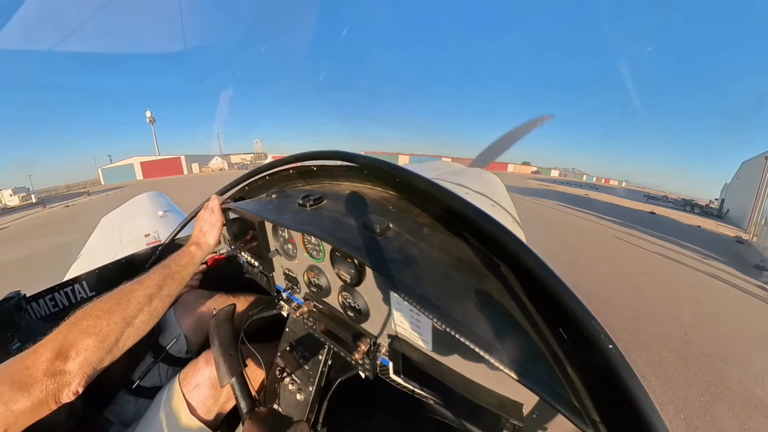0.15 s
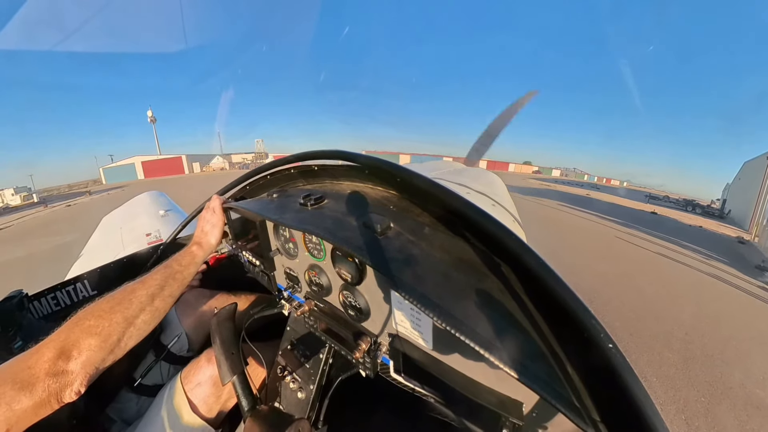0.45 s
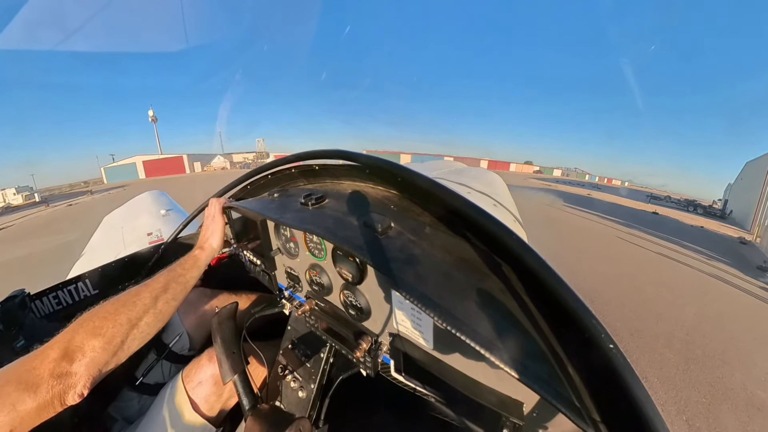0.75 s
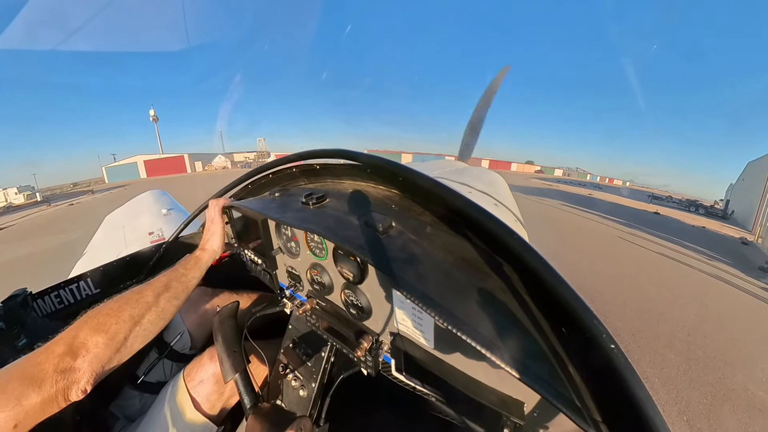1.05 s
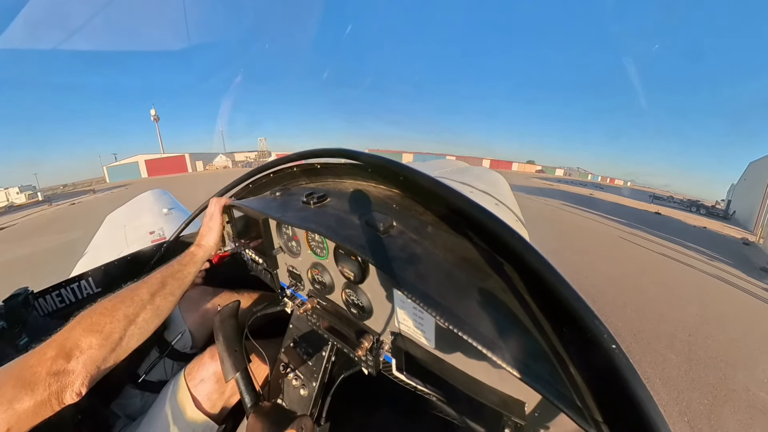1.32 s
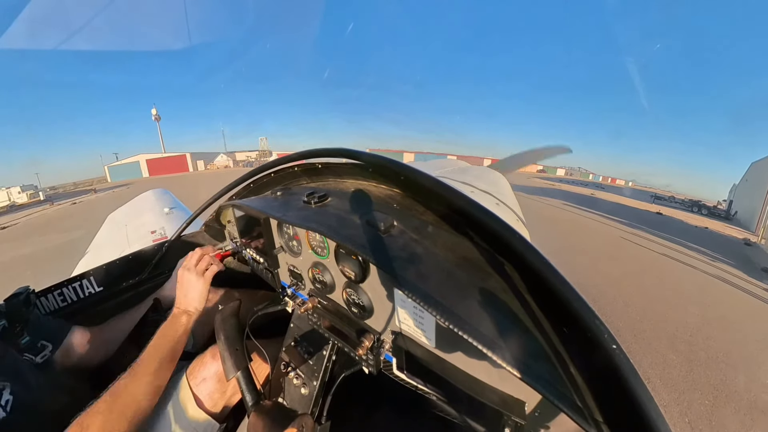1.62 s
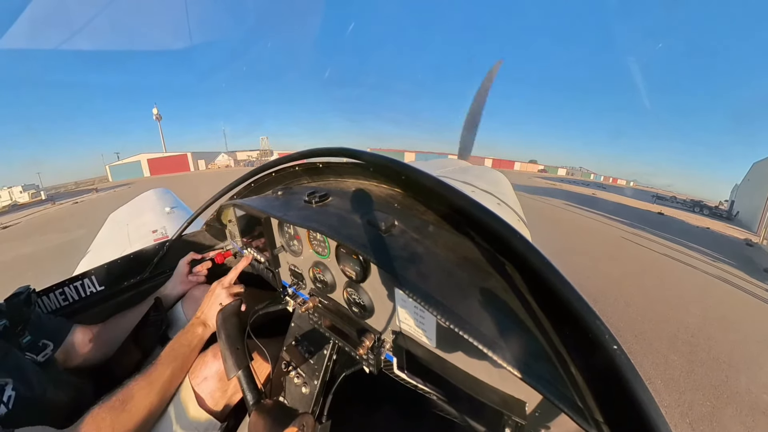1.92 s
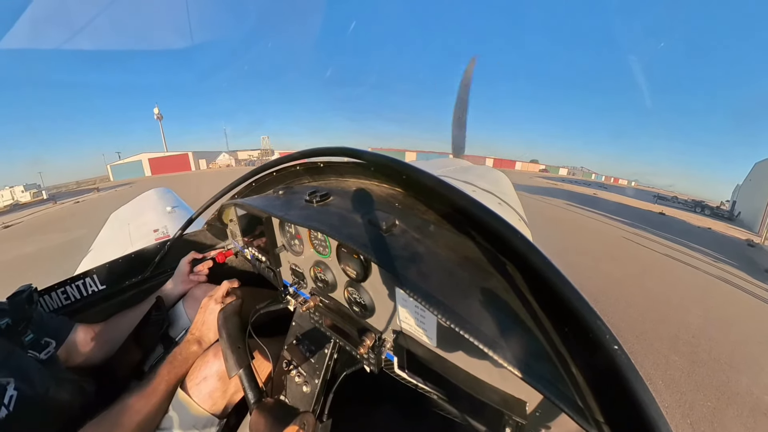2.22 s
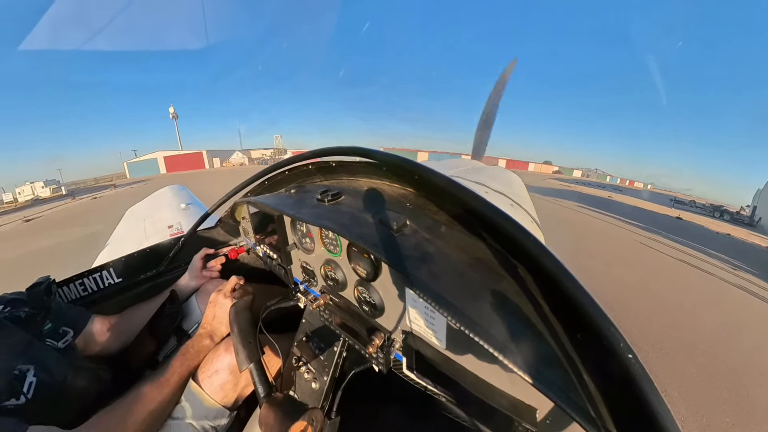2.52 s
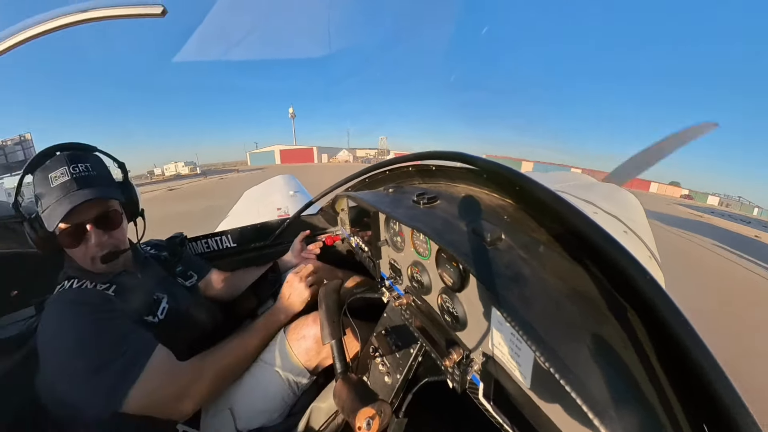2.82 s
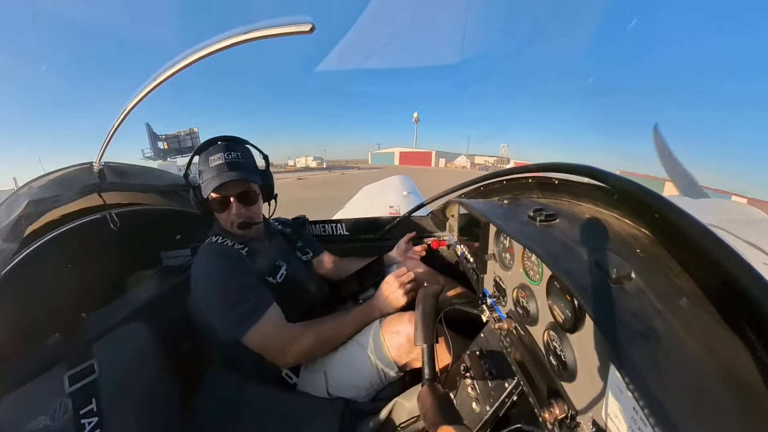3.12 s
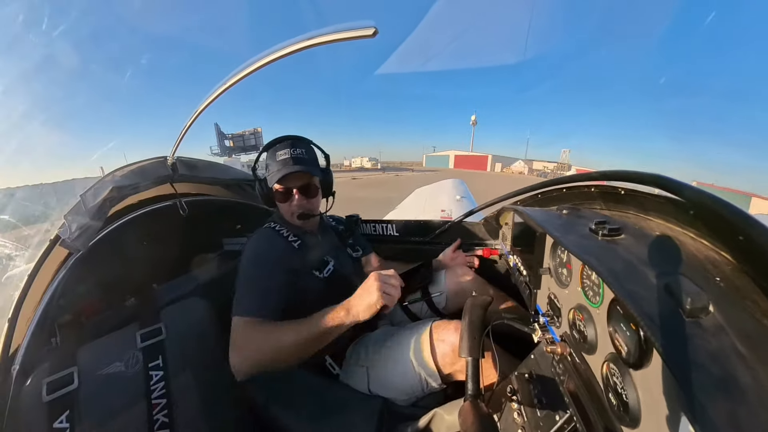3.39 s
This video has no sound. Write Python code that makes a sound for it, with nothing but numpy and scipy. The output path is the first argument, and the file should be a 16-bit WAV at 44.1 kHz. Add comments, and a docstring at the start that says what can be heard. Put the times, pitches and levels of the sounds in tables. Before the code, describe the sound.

Small aircraft engine idles with a low, wavering boom, plus a scuff and a few dry pops

```python
"""Idling aircraft engine from inside the cockpit

Heard in a closed cockpit: a four-cylinder engine booms, a wavering tone at the firing rate under shaped-noise
rumble, with a thin treble of valve gear throbbing once per engine cycle. Firings stumble, and the speed dips
briefly, then sags and recovers. A hand scuffs and ticks on the canopy frame: noise bursts over ringing modes.
A few dry pops right at the microphone are filtered kicks in stereo, with crackle and a faint cabin echo.
"""
import sys
import numpy as np
from scipy import signal
from scipy.fft import rfft, irfft, next_fast_len
from scipy.io import wavfile
from scipy.ndimage import uniform_filter1d

SR = 44100
rng = np.random.default_rng(int(sys.argv[2]) if len(sys.argv) > 2 else 0)


def inscribe(sig):
    """Save sig as 16-bit PCM at rate SR to the path in sys.argv[1].

    A 1-D sig is mono; a 2-D sig holds one channel per row.
    Samples are clipped to [-1, 1] before scaling.
    """
    pcm = np.round(np.clip(np.atleast_2d(sig).T, -1, 1) * 32767)
    wavfile.write(sys.argv[1], SR, pcm.astype(np.int16))


N = 156555
CYLINDERS = 4


def undb(db):
    """Decibels to gain."""
    return 10 ** (np.asarray(db) / 20)


def unit(x):
    """Scale to rms 1."""
    return x / np.sqrt(np.mean(x ** 2))


def curve(rows):
    """Join (seconds, value) rows by straight lines."""
    return np.interp(np.arange(N) / SR, *np.array(rows).T)


def noise():
    """White noise of rms 1."""
    return rng.standard_normal(N)


def walk(rate):
    """Smooth random wandering of rms 1, with about `rate` new values per second."""
    hold = int(SR / rate)
    steps = np.repeat(rng.standard_normal(N // hold + 1), hold)
    smooth = uniform_filter1d(uniform_filter1d(steps, hold), hold)
    return unit(smooth[:N])


def filtered(x, response):
    """Apply a response given as a function of frequency in Hz."""
    size = next_fast_len(2 * N)
    hz = np.maximum(np.fft.rfftfreq(size, 1 / SR), 1e-3)
    return irfft(rfft(x, size) * response(hz), size)[:N]


def colour(x, points):
    """Shape a sound by (Hz, dB) points, joined over log frequency."""
    hz, db = np.array(points).T
    return filtered(x, lambda f: undb(np.interp(np.log(f), np.log(hz), db)))


def swell(start, attack, decay):
    """Linear rise, then exponential fall; all times in seconds."""
    age = np.arange(N) / SR - start
    return np.clip(age / attack, 0, 1) * np.exp(-np.maximum(age - attack, 0) / decay)


def hump(centre, half):
    """A smooth bell of height 1; it falls to 1/e at `half` seconds from the centre."""
    return np.exp(-((np.arange(N) / SR - centre) / half) ** 2)


# Engine speed before its wander. Each row: time in seconds, firings per second.
SPEED_CURVE = [(0.0, 69), (0.15, 76.4), (0.2, 80.6), (0.29, 84.7), (0.325, 68.3), (0.36, 87.6),
               (0.45, 85.7), (0.6, 81.7), (0.72, 84), (0.8, 63), (0.84, 69), (0.92, 69.7), (0.98, 79.5),
               (1.21, 81.8), (1.6, 80.6), (2.0, 78.2), (2.4, 76), (2.9, 76.5), (3.55, 75.8)]
SPEED_WANDER = 0.0096  # rms, as a share of the speed


def firing_rate():
    """The idle follows its speed curve and wanders slightly around it."""
    return curve(SPEED_CURVE) * (1 + SPEED_WANDER * walk(40))


# Stumbles, where firings come weak. Each row: centre in seconds, half length in seconds, depth in dB.
STUMBLE_ROWS = [(0.02,0.0086,16.5),(0.058,0.0086,15.5),(0.102,.013,14),(.135,0.0098,12.5),(0.167,.01,10.5),(0.224,0.01,15.5),(0.374,0.0087,5),(.415,.012,9.5),(0.496,0.017,9.5),(0.768,0.029,6.5),(0.863,.017,16.5),
                (1.116,.015,4),(1.543,.018,4),(2.252,.014,11),(2.35,.014,6),(2.512,.02,6.5),(2.631,.012,12),(2.736,.01,5),(2.835,.016,9),(2.889,.02,8.5),(3.145,0.017,8),(3.51,0.0084,10)]


def stumbles():
    """Weakness of the firings in dB: one smooth bell per stumble."""
    return sum(depth * hump(centre, half) for centre, half, depth in STUMBLE_ROWS)


# Boom heard in the cabin, before trim and flutter. Each row: time in seconds, rms level in dB.
BOOM_LEVEL = [(0.0, -31.5), (0.2, -23), (0.3, -25.5), (0.6, -23.5), (0.7, -26.5), (0.8, -33), (0.9, -22),
              (1.05, -26), (1.5, -24.5), (2.2, -23.5), (2.7, -24), (3.1, -25), (3.55, -24.5)]
BOOM_TRIM_DB, BOOM_FLUTTER_DB = 0.15, 1.2
CABIN_HZ, SLIP_SHARE = 89.87, 0.6036  # the cabin's own pitch; how readily the boom slips to it


def boom(firing_hz, weak_db):
    """The cabin booms at the firing rate; weak firings let it fade and slip toward the cabin's own pitch."""
    slip = 1 - undb(-weak_db * SLIP_SHARE)
    boom_hz = firing_hz + slip * (CABIN_HZ - firing_hz)
    tone = np.sqrt(2) * np.sin(2 * np.pi * np.cumsum(boom_hz) / SR)
    level_db = curve(BOOM_LEVEL) + BOOM_TRIM_DB - weak_db + BOOM_FLUTTER_DB * walk(50)
    return tone * undb(level_db)


# Airframe rumble before trim and stumbles. Each row: time in seconds, level in dB.
RUMBLE_LEVEL = [(0,-37.5),(.11,-37.5),(.19,-38),(.25,-42),(.31,-44),(.35,-38),(.43,-39.5),(.48,-42.5),(.66,-44),(.77,-46),(.83,-46),(.862,-39.5),(.9,-42.5),(1.05,-41),(1.26,-41),(1.45,-44),(2.0,-43.5),(2.42,-43),(2.68,-41),(2.77,-42.5),(2.87,-43.5),(3.05,-43),(3.35,-43.5),(3.55,-39.5)]
# Cabin response to the firings. Each row: frequency in Hz, relative density in dB per Hz.
CABIN_COLOUR = [(15,-17.5),(30,-8),(55,-5.5),(75,-17.5),(110,3.5),(160,-0.5),(182,-4),(208,-1),(245,-6),(290,-8),(340,-10),(420,-13),(520,-20.5),(700,-27),(1000,-37.5),(1400,-42),(2000,-51),(5000,-81.5),(12000,-105)]
RUMBLE_TRIM_DB, RUMBLE_FLUTTER_DB = 0.56, 1.36
FIRING_PULSE_DB, CYCLE_PULSE_DB = 3.3, 1.2
STUMBLE_SHAKE = 0.1  # dB more rumble per dB of stumble


def rumble(cycles, weak_db):
    """The exhaust shakes the airframe with each firing and each engine cycle, harder in a stumble."""
    surge_db = FIRING_PULSE_DB * np.cos(2 * np.pi * CYLINDERS * cycles)
    surge_db = surge_db + CYCLE_PULSE_DB * np.cos(2 * np.pi * cycles) + RUMBLE_FLUTTER_DB * walk(25)
    shaking = unit(colour(noise() * undb(surge_db), CABIN_COLOUR))
    return shaking * undb(curve(RUMBLE_LEVEL) + RUMBLE_TRIM_DB + STUMBLE_SHAKE * weak_db)


# Low buffeting under the rumble. Each row: time in seconds, level in dB.
BUFFET_LEVEL = [(0,-32),(.13,-41),(.24,-35),(.42,-44.5),(.55,-51),(.8,-45.5),(1.0,-50),(1.4,-49.5),(2.2,-44),(2.65,-44),(2.9,-35),(3.05,-51.5),(3.55,-49)]
# Its spectrum. Each row: frequency in Hz, relative density in dB per Hz.
BUFFET_SPECTRUM = [(12,-17.5),(25,-5),(52,5.5),(75,-4.5),(105,10),(160,-3.5),(200,-22),(400,-71),(1500,-110)]


def buffeting():
    """Low-frequency noise whose level rises and falls."""
    return unit(colour(noise(), BUFFET_SPECTRUM)) * undb(curve(BUFFET_LEVEL))


# Weaker shaft lines, before effort and flutter. Each row: multiple of the engine cycle, rms level in dB.
SHAFT_LINE_ROWS = [(2, -41), (3, -45), (5, -47), (6, -47.5), (7, -54), (8, -56), (10, -54.5), (11, -54.5),
                   (13, -57.5), (14, -56)]
SHAFT_FLUTTER_DB, SHAFT_WAVER = 3, .2  # waver is in turns of phase
SHUDDER_S, SHUDDER_HALF_S, SHUDDER_DB = .84, 0.17, -36.5


def shaft_lines(cycles):
    """Unequal cylinders add wavering lines that come and go; the engine rocks at shaft rate as it sags."""
    # the shaft turns twice per engine cycle
    tone = np.sin(4 * np.pi * cycles) * undb(SHUDDER_DB) * hump(SHUDDER_S, SHUDDER_HALF_S)
    effort_db = curve(RUMBLE_LEVEL) - np.mean(curve(RUMBLE_LEVEL))
    for multiple, db in SHAFT_LINE_ROWS:
        phase = multiple * cycles + rng.random() + SHAFT_WAVER * walk(12)
        tone = tone + np.sin(2 * np.pi * phase) * undb(db + effort_db + SHAFT_FLUTTER_DB * walk(14))
    return np.sqrt(2) * tone


# Reference level of the treble in the cabin. Each row: time in seconds, level in dB.
TREBLE_LEVEL = [(0,-73),(.16,-72),(.21,-79),(.27,-75),(.36,-74),(.44,-73),(.47,-83),(.5,-78),(.515,-75),(.62,-74.5),(.72,-79),(.85,-76),(1.15,-75.5),(1.46,-74),(1.53,-78),(1.62,-75),(2.1,-75.5),(2.14,-77.5),(2.18,-72.5),(2.39,-73.5),(2.44,-79),(2.47,-75),(2.58,-76),(2.63,-74.5),(2.8,-75.5),(2.87,-76.5),(3.0,-73.5),(3.2,-76),(3.39,-73.5),(3.45,-77),(3.48,-75),(3.55,-76)]
# Valve gear rings. Each row: frequency in Hz, width in Hz, level in dB relative to the treble.
RING_ROWS = [(1499, 160, -1.5), (2606, 150, -9.5), (3320, 330, -11)]
# Mechanical hiss from the cowling. Each row: frequency in Hz, relative density in dB per Hz.
HISS_COLOUR = [(600,-12.5),(1200,-3),(1900,-3.5),(2250,0.5),(2650,-1),(2950,0),(3350,1),(3900,-2.5),(4400,-6),(5200,-11.5),(6500,-26.5),(9000,-39.5),(15000,-53)]
VALVE_PULSE_DB, VALVE_SCATTER_DB = 4, 2.5
HISS_DB = 1.46  # relative to the treble
HISS_PULSE_DB, HISS_CLUMP_DB, HISS_FLUTTER_DB = 0.86, 1.0, 2.2
STUMBLE_HUSH = .2  # dB less treble per dB of stumble


def valve_gear(cycles, weak_db):
    """Narrow rings and a hiss throb unevenly with the engine cycle and drop in a stumble."""
    throb = np.cos(2 * np.pi * cycles)
    rings = 0
    for hz, width_hz, db in RING_ROWS:
        drive = noise() * undb(VALVE_PULSE_DB * throb + VALVE_SCATTER_DB * walk(30))
        ring = filtered(drive, lambda f: 1 / (1 + 1j * (f - hz ** 2 / f) / width_hz) ** 2)
        rings = rings + undb(db) * unit(ring)
    # the hiss pulses once and twice per cycle
    clumps_db = HISS_PULSE_DB * (throb + np.cos(4 * np.pi * cycles))
    clumps_db = clumps_db + HISS_CLUMP_DB * walk(35) + HISS_FLUTTER_DB * walk(130)
    hiss = unit(colour(noise() * undb(clumps_db), HISS_COLOUR))
    return (rings + hiss * undb(HISS_DB)) * undb(curve(TREBLE_LEVEL) - STUMBLE_HUSH * weak_db)


def microphone_hiss():
    """Steady faint white noise of the microphone."""
    return undb(-101) * noise()


# Hand scuffs on the canopy frame. Each row: start in seconds, attack in seconds, decay in seconds, level in dB.
SCUFF_ROWS = [(0.635,0.011,0.013,-49),(.864,.003,0.066,-64.5),(0.94,0.025,0.13,-68),(1.426,0.0029,0.0085,-65)]
# Scuff spectrum. Each row: frequency in Hz, relative density in dB per Hz.
SCUFF_COLOUR = [(500,-17),(1200,-7),(1500,-7.5),(1750,-12.5),(2400,0),(2750,2.5),(3100,-3),(3550,-6),(5000,-14),(6500,-32.5),(13000,-36),(16000,-47.5)]
# Frame ringing under the first scuff. Each row: frequency in Hz, peak level in dB, time to fall 60 dB in seconds.
FRAME_RINGS = [(409,-40.5,0.16),(606,-48,0.12)]
SCUFF_GRAIN_DB = 2.2
FRAME_S = .645  # start of the ringing


def scuffs():
    """A hand rubs the canopy frame as grainy noise, and two frame modes ring briefly."""
    t = np.arange(N) / SR
    rub = unit(colour(noise() * undb(SCUFF_GRAIN_DB * walk(520)), SCUFF_COLOUR))
    strokes = sum(undb(db) * swell(s, attack, decay) for s, attack, decay, db in SCUFF_ROWS)
    ring = 0
    for hz, db, t60 in FRAME_RINGS:
        ring = ring + undb(db) * np.sin(2 * np.pi * hz * t) * swell(FRAME_S, 0.0045, t60 / np.log(1000))
    return rub * strokes + ring


# Small bright ticks on the frame. Each row: start in seconds, level in dB.
TICK_ROWS = [(1.965,-60),(1.987,-63.5)]
# Tick spectrum. Each row: frequency in Hz, relative density in dB per Hz.
TICK_COLOUR = [(800,-2),(1500,-3),(2500,-5.5),(4000,0),(5200,-4.5),(6300,-5.5),(7800,-15.5),(10400,-13),(12000,-29),(16000,-48)]
# Metallic ring after a tick. Each row: frequency in Hz, relative density in dB per Hz.
SHIMMER_COLOUR = [(4000,-18),(6300,-2.5),(7800,-7.5),(9200,-7.5),(9300,4),(9400,-8.5),(10400,-5.5),(10500,12),(10600,-6),(11300,-11.5),(15000,-14.5)]
TICK_DECAY_S = 0.003
SHIMMER_DB, SHIMMER_DECAY_S = -25.5, 0.077  # level relative to its tick


def ticks():
    """The hand ticks the frame: a very short noise burst, then a fainter metallic shimmer."""
    taps = sum(undb(db) * swell(s, .0005, TICK_DECAY_S) for s, db in TICK_ROWS)
    tails = sum(undb(db + SHIMMER_DB) * swell(s, .002, SHIMMER_DECAY_S) for s, db in TICK_ROWS)
    return unit(colour(noise(), TICK_COLOUR)) * taps + unit(colour(noise(), SHIMMER_COLOUR)) * tails


# Dry pops at the microphone. Each row: start in seconds, drive level in dB before filtering, body in Hz,
# edge in Hz, snap share from 0 to 1, top in Hz, left minus right of the thud in dB.
POP_ROWS = [(2.031,-16,300.2,481,0.03,1234,-3),(2.0521,-12.5,172,467,.001,2490,-8.5),(2.2188,-8.5,292,1080,0.36,8760,-10.5),(2.2405,-3,246,1330,0,5120,2.5),(2.9218,-7,211.2,1737,0.44,15010,3.5)]
POP_DAMPING = 0.9


def pops():
    """Each pop is a damped pressure swing: a soft thud to one side, plus a share of central snap."""
    out = np.zeros((2, N))
    for s, db, body_hz, edge_hz, snap, top_hz, pan_db in POP_ROWS:
        kick = np.zeros(N)
        kick[int(s * SR)] = undb(db) * SR / (2 * np.pi * body_hz)
        swing = filtered(kick, lambda f: 1 / (POP_DAMPING + 1j * (f / body_hz - body_hz / f)))
        swing = signal.sosfilt(signal.butter(4, top_hz, fs=SR, output="sos"), swing)
        thud = filtered(swing, lambda f: (1 - snap) / (1 + 1j * f / edge_hz) ** 2)
        out += thud * undb(np.array([[pan_db], [-pan_db]]) / 2) + snap * swing
    return out


# Crackle around the sharpest pops. Each row: start in seconds, length in seconds, level in dB before widening.
CRACKLE_ROWS = [(2.212,0.017,-43),(2.9123,0.014,-39)]
# Crackle spectrum. Each row: frequency in Hz, relative density in dB per Hz.
CRACKLE_COLOUR = [(200,1.5),(900,1.5),(2000,-7.5),(5500,-21),(8000,-28),(10000,-39.5),(15000,-34.5)]
CRACKLE_SPREAD, CRACKLE_GRAIN_DB = 0.85, 3  # side relative to mid; random level of each sample


def crackle():
    """Short bursts of grainy noise, spread wide across left and right."""
    t = np.arange(N) / SR
    mid, side = (unit(colour(noise() * undb(CRACKLE_GRAIN_DB * noise()), CRACKLE_COLOUR)) for _ in range(2))
    grains = mid + CRACKLE_SPREAD * side * np.array([[1], [-1]])
    bursts = 0
    for s, length, db in CRACKLE_ROWS:
        bursts = bursts + undb(db) * np.sin(np.pi * np.clip((t - s) / length, 0, 1))
    return grains * bursts


# Colour of the cabin echo. Each row: frequency in Hz, relative level in dB.
ECHO_COLOUR = [(200,-31),(700,-9),(2000,-1),(4000,-5),(6000,1),(9000,1),(14000,-8)]
ECHO_DB, ECHO_T60_S = -30, 0.94


def cabin_echo(x):
    """A faint diffuse tail: convolution with decaying noise, different left and right."""
    echo = []
    for _ in range(2):
        tail = colour(noise(), ECHO_COLOUR) * swell(0, .004, ECHO_T60_S / np.log(1000))
        echo.append(signal.fftconvolve(x, tail / np.linalg.norm(tail))[:N])
    return undb(ECHO_DB) * np.array(echo)


def scene():
    """Engine and hand sounds sit in the centre; pops, crackle and echo use both channels."""
    firing_hz = firing_rate()
    cycles = np.cumsum(firing_hz) / SR / CYLINDERS
    weak_db = stumbles()
    engine = boom(firing_hz, weak_db) + rumble(cycles, weak_db) + buffeting()
    engine = engine + shaft_lines(cycles) + valve_gear(cycles, weak_db)
    close = pops() + crackle()
    centre = engine + microphone_hiss() + scuffs() + ticks()
    return centre + close + cabin_echo(close.mean(axis=0))


BASS_SPLIT_HZ, BASS_CEILING_DB, LIMITER_S = 135, -21, .006
TOP_HZ = 16200


def record(dry):
    """The recorder holds the shared bass near a ceiling and cuts the top."""
    bass = filtered(dry.mean(axis=0), lambda f: 1 / (1 + (f / BASS_SPLIT_HZ) ** 8))
    window = int(LIMITER_S * SR)
    envelope = uniform_filter1d(np.abs(signal.hilbert(bass)), window)
    gain = uniform_filter1d(np.minimum(1, undb(BASS_CEILING_DB) / (envelope + 1e-9)), window)
    limited = dry + bass * (gain - 1)
    return signal.sosfilt(signal.ellip(8, .2, 70, TOP_HZ, fs=SR, output="sos"), limited)


dry = scene()
out = record(dry)
inscribe(out)
```